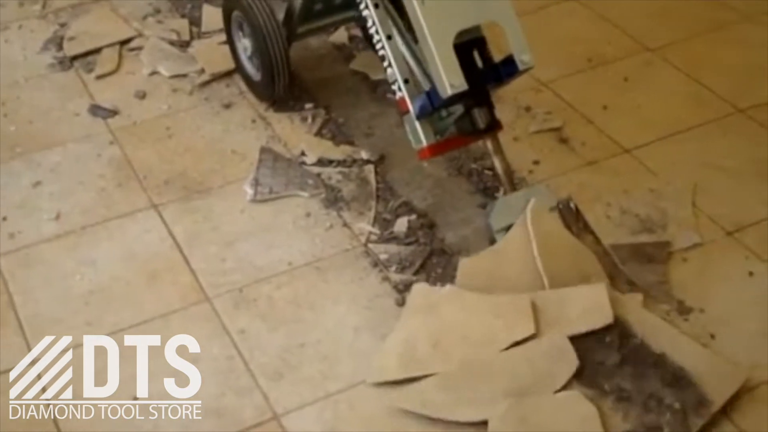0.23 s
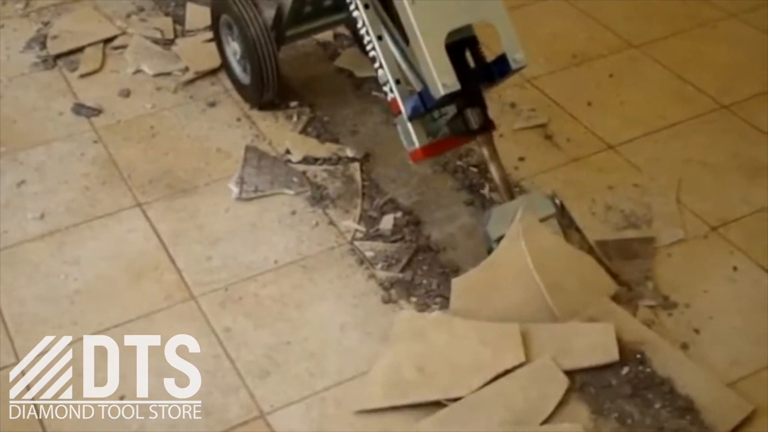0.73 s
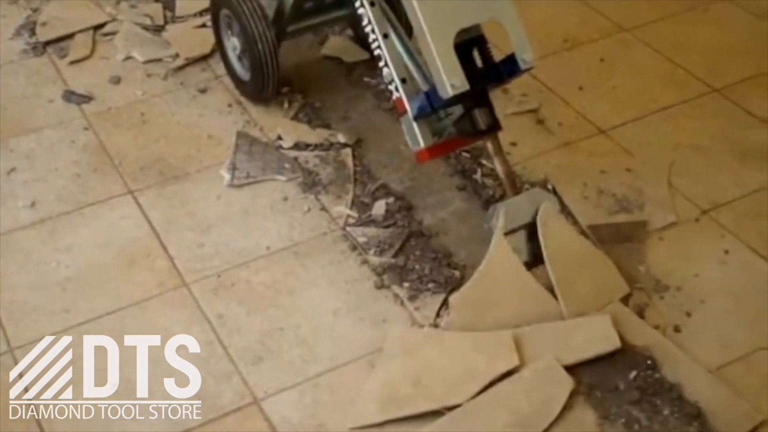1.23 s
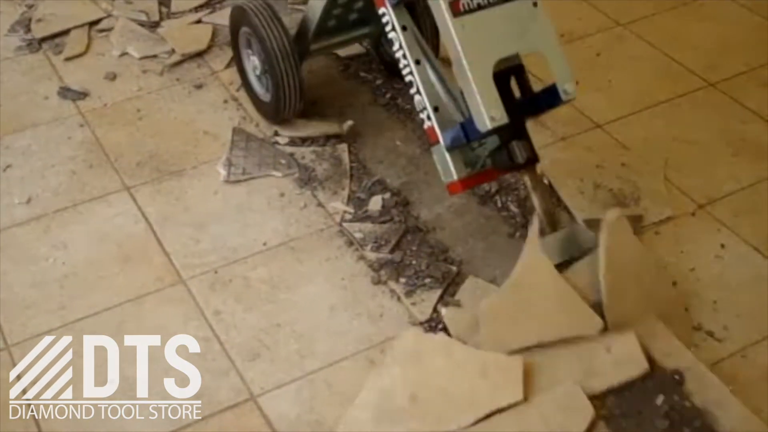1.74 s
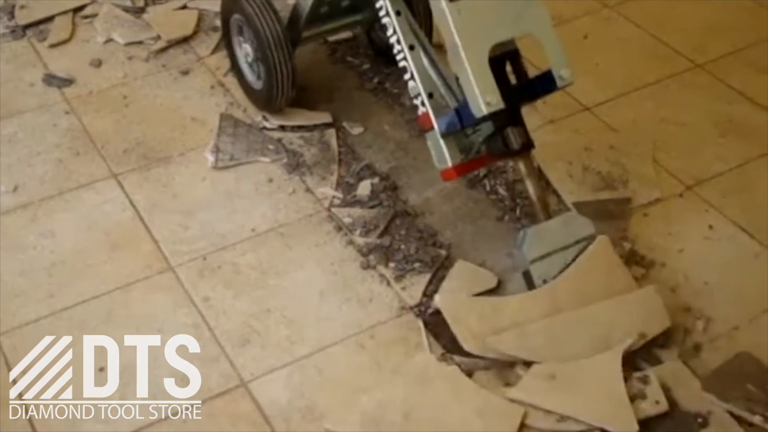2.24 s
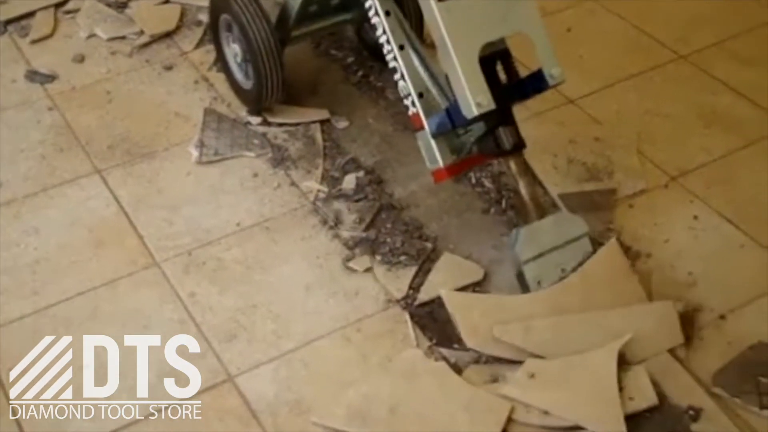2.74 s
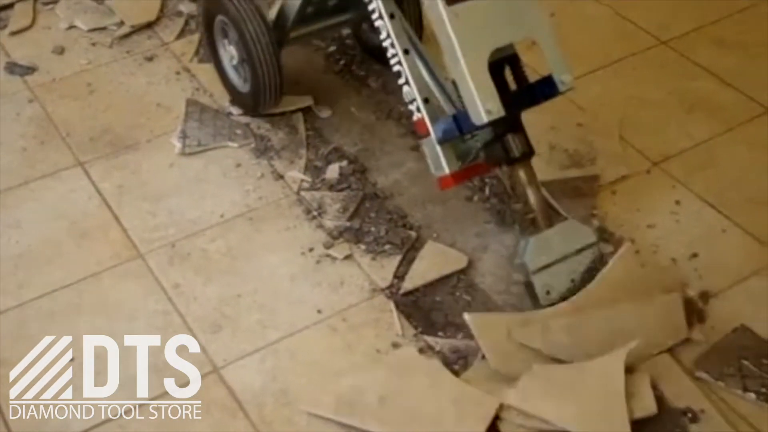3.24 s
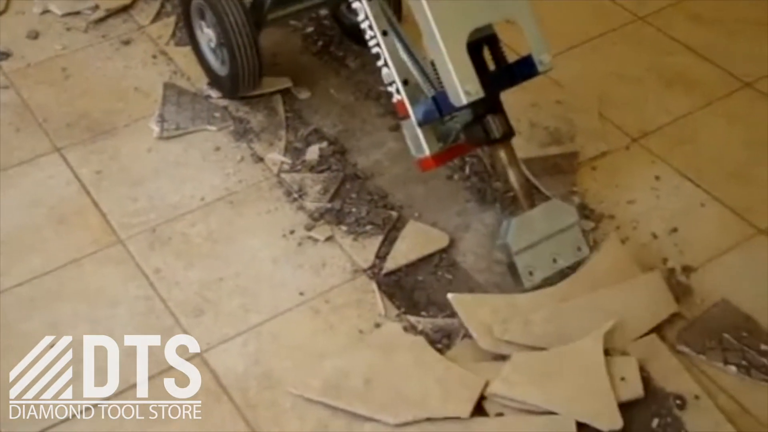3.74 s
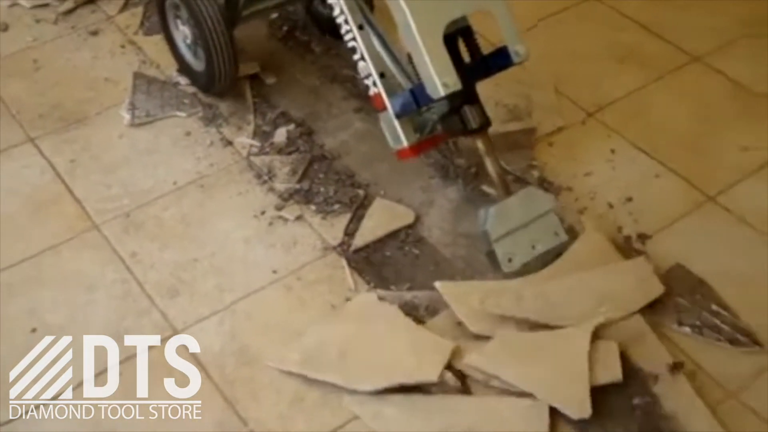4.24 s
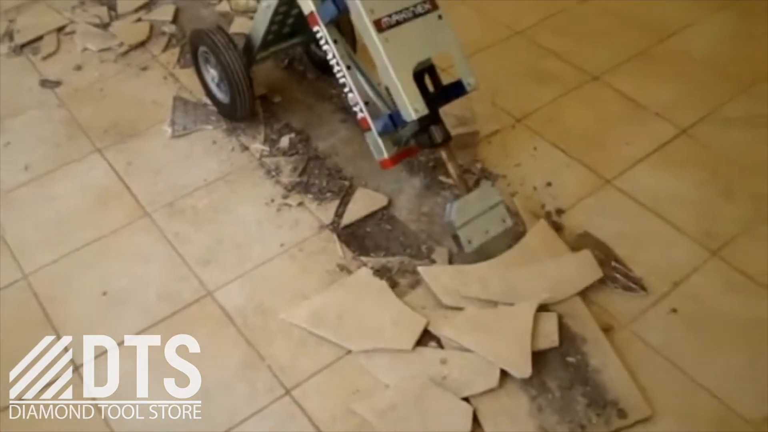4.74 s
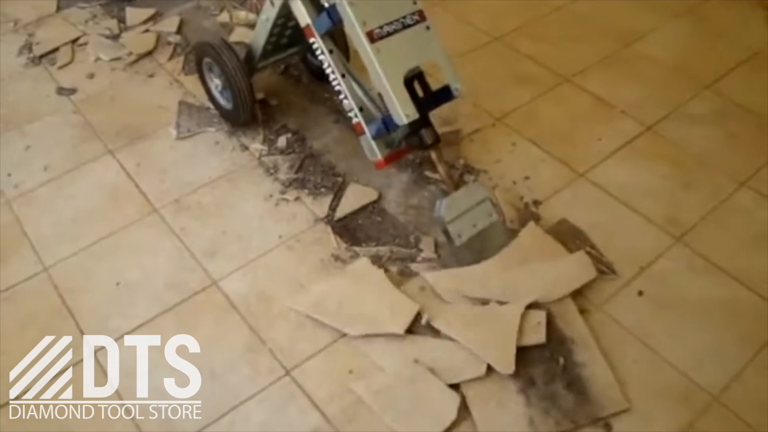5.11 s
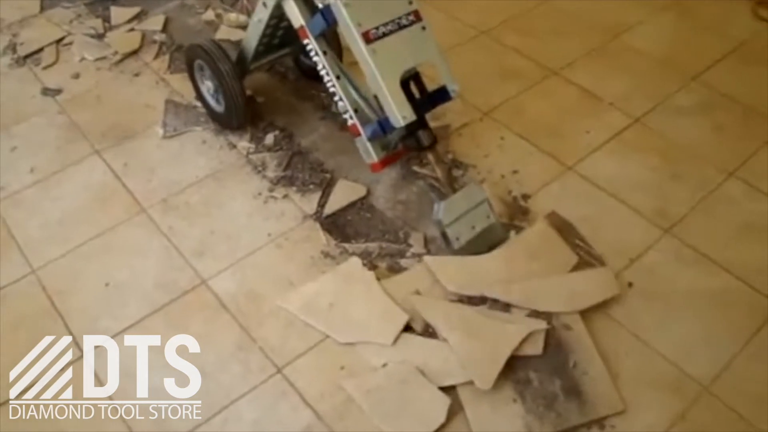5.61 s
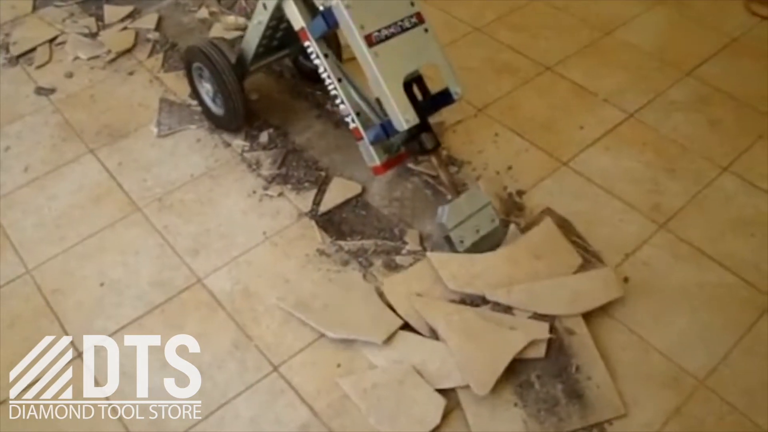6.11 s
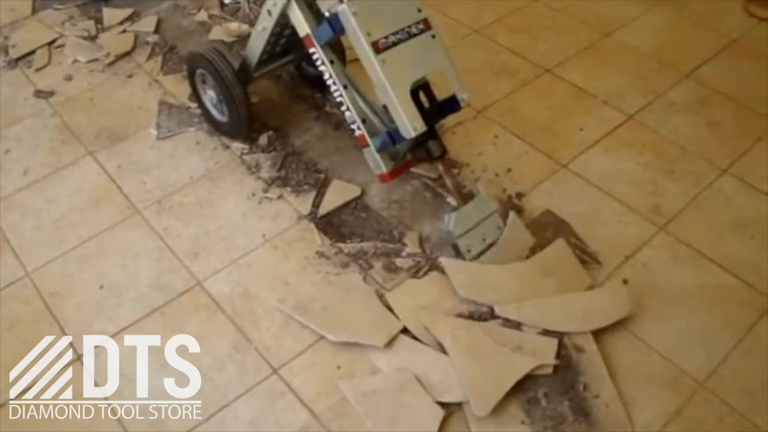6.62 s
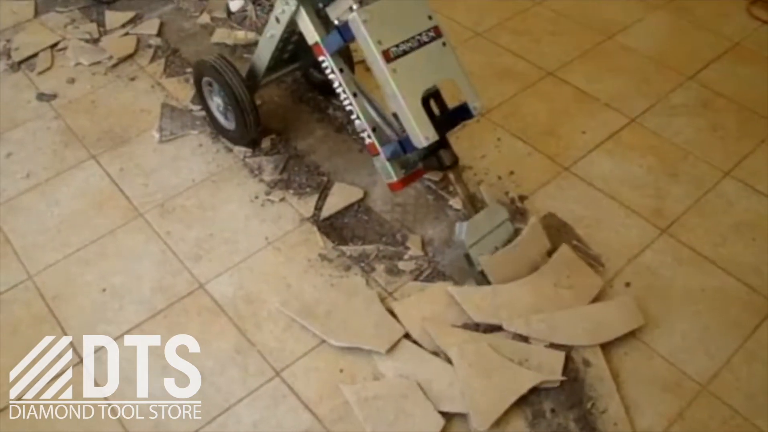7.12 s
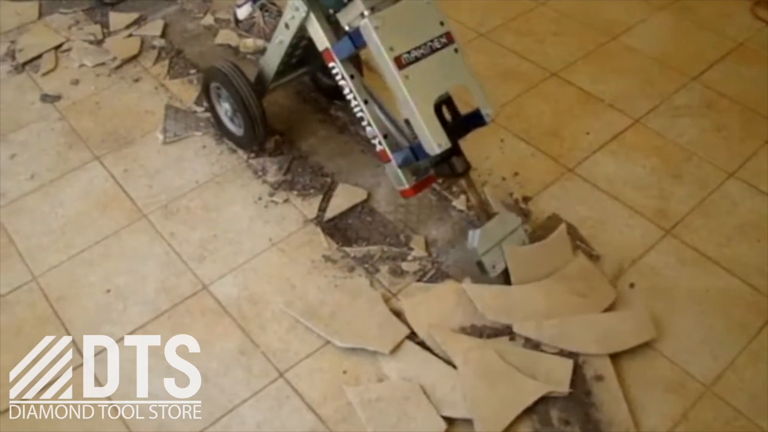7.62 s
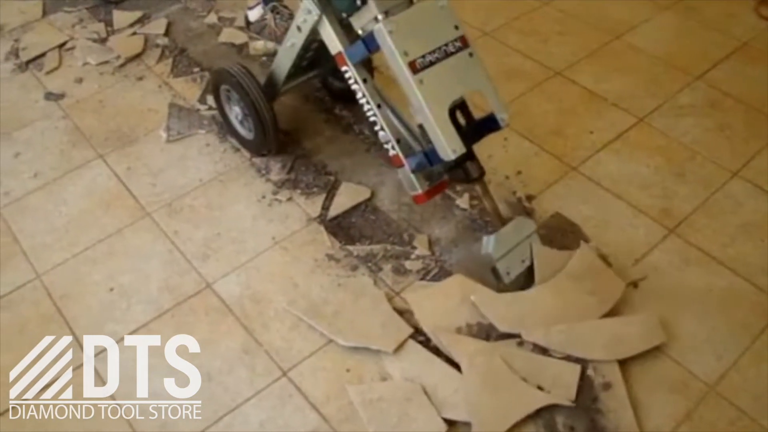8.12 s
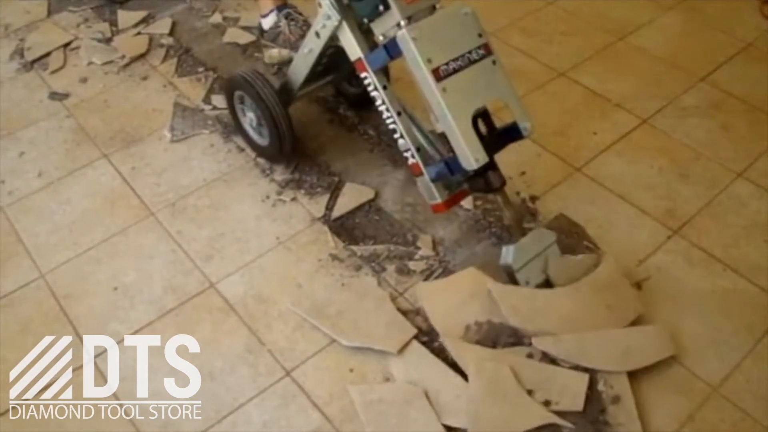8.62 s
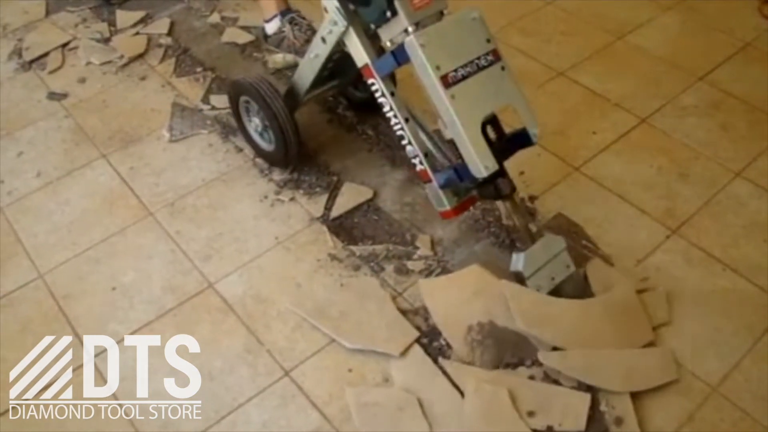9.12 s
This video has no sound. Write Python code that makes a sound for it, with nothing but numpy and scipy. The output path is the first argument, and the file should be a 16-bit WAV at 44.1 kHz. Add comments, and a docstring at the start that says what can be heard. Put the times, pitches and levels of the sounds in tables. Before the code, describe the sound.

In a hard, reverberant room, a nearby electric demolition hammer keeps up a fast, gritty metallic rattle as it lifts ceramic tiles from concrete. Surges of chattering tile and dull thudding come as the blade bites in, heaviest in the first half. Later the machine's own rattle and hum stand out more, while scattered brittle cracks and the crunch of mortar continue to the end.

```python
"""A rapid, gritty hammering fills a bare room: an electric demolition hammer is lifting ceramic tiles.
Each blow, about 24 a second, excites the modes of the housing, the steel chisel and the concrete floor.
The blade bites in and slows the motor, prises up tiles that chatter and crack, and now and then
rides off the mortar. Beneath it the mortar crunches, the motor whines and its fan blows, and the
hammer's trolley and the floor hum in forced vibration."""
import sys
import numpy as np
from scipy import signal
from scipy.fft import rfft, irfft, next_fast_len
from scipy.io import wavfile

SR = 44100
rng = np.random.default_rng(int(sys.argv[2]) if len(sys.argv) > 2 else 0)


def to_wav(sig):
    """Store sig (one row per channel, or 1-D mono) as 16-bit WAV at the path in sys.argv[1].

    Samples outside -1..1 are clipped; the rate is SR.
    """
    pcm = np.clip(np.atleast_2d(sig), -1, 1) * 32767
    pcm = np.round(pcm).astype(np.int16)
    wavfile.write(sys.argv[1], SR, pcm.T)  # frames by channels


N = 413216


def undb(db):
    """Decibels to amplitude ratio."""
    return 10 ** (np.asarray(db) / 20)

def unit(x):
    """Normalisation to rms 1."""
    return x / np.sqrt(np.mean(x ** 2))

def curves(table):
    """Linear interpolation of each column over time."""
    times, *columns = np.transpose(table)
    return [np.interp(np.arange(N) / SR, times, column) for column in columns]

def envelope(start, length, attack_s, release_s):
    """Linear rise to 1, a hold, then exponential decay."""
    t = np.arange(N) / SR - start
    return np.clip(t / attack_s, 0, 1) * np.exp(-np.maximum(t - length, 0) / release_s)

def swells(table, attack_s, release_s):
    """Incoherent events add in power: one gain curve for each level column."""
    power = sum(np.outer(undb(db) ** 2, envelope(start, length, attack_s, release_s) ** 2)
                for start, length, *db in table)
    return np.sqrt(power)

def colour(x, spectrum):
    """Spectral shaping by (Hz, dB) points, to rms 1."""
    hz, db = np.transpose(spectrum)
    size = next_fast_len(N + SR // 2)
    f = np.maximum(np.fft.rfftfreq(size, 1 / SR), 1)
    gain = undb(np.interp(np.log(f), np.log(hz), db))
    return unit(irfft(rfft(x, size) * gain, size)[:N])

def through(x, response):
    """Convolution with an impulse response."""
    return signal.oaconvolve(x, response)[:len(x)]

def ringing(modes):
    """Modal superposition: a tap excites a damped sine for each (Hz, dB, t60) mode."""
    t = np.arange(SR // 5) / SR
    return sum(undb(db) * np.sin(2 * np.pi * hz * t) * np.exp(-np.log(1000) * t / t60) * (-1) ** k
               for k, (hz, db, t60) in enumerate(modes))

def burst(t60):
    """Modal overlap: countless modes merge into decaying noise of unit energy."""
    decay = np.exp(-np.log(1000) * np.arange(int(t60 * SR) + 1) / (t60 * SR))[:SR]
    noise = rng.standard_normal(SR)[:len(decay)] * decay
    return noise / np.linalg.norm(noise)

def diffuse(x, t60, patterns):
    """Time-varying response: dense ringing crossfades between patterns as the machine moves."""
    place, out = np.linspace(0, patterns - 1, N), np.zeros(N + SR)
    for k in range(patterns):
        at = np.flatnonzero(abs(place - k) < 1)
        crossfade = np.cos(np.pi / 2 * (place[at] - k))
        sound = signal.fftconvolve(x[at] * crossfade, burst(t60))
        out[at[0]:at[0] + len(sound)] += sound
    return out[:N]

def clicks(times, sizes):
    """Brief contacts act as impulses; times in seconds."""
    at = np.round(times * SR).astype(int)
    inside = (at >= 0) & (at < N)
    return np.bincount(at[inside], sizes[inside], N)

def blows(turns, share, scatter_db, jitter_s):
    """Quasi-periodic excitation: one impulse a crank turn, uneven in force and timing."""
    chance = np.clip(rng.standard_normal((240, 2)), -1.7, 1.7)
    times = np.interp(np.arange(len(chance)) + share, turns, np.arange(N) / SR, left=-1, right=-1)
    return clicks(times + jitter_s * chance[:, 0], undb(scatter_db * chance[:, 1]))

def bounces(turns, per_s, spread_db, bunching):
    """A Poisson process: loose things collide at random, hardest just after each blow."""
    hit = rng.random(N) < per_s / SR
    size = undb(spread_db * np.clip(rng.standard_normal(N), -2, 2)) * rng.choice([-1, 1], N)
    return hit * size * np.exp(-bunching * (turns % 1))

def wander(cycles):
    """Random modulation: a glide to a new Gaussian value each cycle."""
    values = rng.standard_normal(240)
    return np.interp(cycles, np.arange(len(values)), values)

def harmonics(turns, orders, phases):
    """Fourier series on the blow rate; phases in cycles."""
    return unit(sum(undb(db) * np.sin(2 * np.pi * (round(k) * turns + phases[round(k)]))
                    for k, db in orders))


def room(x, wet_db):
    """Reverberation: hard floor and bare walls return a diffuse wash, weak in the bass."""
    low_cut = signal.butter(2, 260, "high", fs=SR, output="sos")
    tail = signal.sosfilt(low_cut, diffuse(x, t60=1, patterns=48))
    wash = np.r_[np.zeros(SR // 250), tail][:N]
    return (x + undb(wet_db) * wash) / np.sqrt(1 + undb(2 * wet_db))

# Partials of the machine's hum (the trolley shaking and the motor's 750 Hz whine) and of the floor's.
# Each row: multiple of the blow rate, relative level in dB.
MACHINE_PARTIALS = [(1, -16), (2, -14), (3, -15), (4, -15), (5, -16), (6, -4.5), (7, -16), (8, -7),
                    (9, -13), (12, 0), (13, 0), (14, 0), (15, -5), (16, -4), (17, 0), (18, 3), (24, 6),
                    (31, 9)]
FLOOR_PARTIALS = [(6, -7), (7, -17), (12, -8), (13, -1), (14, -8), (15, 0), (16, -6), (17, -3)]
def hum(turns, thud, recoil_db):
    """Forced vibration: the machine hums louder with the blade free, the floor with it wedged."""
    phases = rng.random(32)
    machine = undb(-51.5 + recoil_db) * harmonics(turns, MACHINE_PARTIALS, phases)
    floor = thud * undb(-17 - recoil_db) * harmonics(turns, FLOOR_PARTIALS, phases + .25)
    return machine + floor

# Spectrum of mortar and fan. Each row: frequency in Hz, relative level in dB.
GRIT_SPECTRUM = [(30, -44.5), (120, -28.5), (250, -21.5), (600, -7.5), (2000, 2.5), (4500, 1.5),
                 (5600, 5.5), (6400, 1), (7100, 4), (7700, 2), (8200, 3.5), (9000, 1), (10000, 0.5)]
def mortar_and_fan(turns):
    """Shot noise: mortar is crushed grain by grain over the broadband rush of the fan."""
    grains = bounces(turns, per_s=5000, spread_db=4, bunching=.7)
    grip = undb(2 * wander(turns))
    fan = undb(-11) * rng.standard_normal(N)
    return colour(unit(grains * grip) + fan, GRIT_SPECTRUM)

def plates(contacts, low_hz, high_hz, t60, modes, clack_db):
    """Plate vibration: each contact clacks and excites modes that change as tiles shift and break."""
    ring, hop = np.zeros(N + SR), SR // 14
    for start in range(0, N, hop):
        plate = [(low_hz + (high_hz - low_hz) * u, 0, t60 * (.5 + v)) for u, v in rng.random((modes, 2))]
        sound = signal.fftconvolve(contacts[start:start + hop], ringing(plate))
        ring[start:start + len(sound)] += sound
    return unit(ring[:N]) + undb(clack_db) * unit(contacts)

# Spectra of whole tiles and of broken pieces. Each row: frequency in Hz, relative level in dB.
TILE_SPECTRUM = [(200, -32), (450, -12.5), (620, -6.5), (780, -6.5), (1050, 3.5), (1190, -2), (1260, 1.5),
                 (1350, -4), (1700, -8.5), (2600, -8.5)]
PIECE_SPECTRUM = [(400, -45.5), (900, -8), (1600, -7), (1950, -1.5), (2280, -1.5), (2440, 1.5),
                  (2560, -3.5), (3020, -5), (3170, -3.5), (3750, -3.5), (4400, -7), (5800, -18),
                  (10000, -12.5)]
# Steady chatter of the heap before the blade. Each row: time in seconds, tiles in dB, pieces in dB.
HEAP_LEVELS = [(0, -30, -23), (.85, -30, -22), (2.8, -28, -22), (3.6, -25.5, -22.5), (4.7, -28.5, -22.5),
               (5.5, -28.5, -21), (6.2, -37.5, -29.5), (7, -41, -23.5), (7.75, -30.5, -23),
               (8.25, -40, -26.5), (8.85, -39, -28.5), (9.37, -29, -26)]
def chatter(turns, bite_tiles, prise_tiles, prise_pieces):
    """Impact excitation: ceramic bounces on the blade, small pieces ringing higher than whole tiles."""
    heavy = bounces(turns, per_s=800, spread_db=2, bunching=.3)
    light = bounces(turns, per_s=2200, spread_db=2.5, bunching=.1)
    tiles = plates(heavy, low_hz=541, high_hz=1737, t60=.025, modes=14, clack_db=10)
    pieces = plates(light, low_hz=1582, high_hz=4742, t60=.036, modes=20, clack_db=13.5)
    heap_tiles, heap_pieces = undb(curves(HEAP_LEVELS))
    tiles_gain = np.sqrt(heap_tiles ** 2 + bite_tiles ** 2 + prise_tiles ** 2)
    pieces_gain = np.hypot(heap_pieces, prise_pieces)
    return tiles_gain * colour(tiles, TILE_SPECTRUM) + pieces_gain * colour(pieces, PIECE_SPECTRUM)

# Tiles snapping. Each row: start in seconds, level in dB, pitch in Hz.
FRACTURES = [(.209, -23, 2450), (1.719, -12, 1250), (2.01, -3, 2730), (2.412, -5.5, 1280),
             (4.131, -9, 2440), (6.681, -8, 4650), (8.006, -9.5, 4300), (8.6, -9, 1398),
             (8.906, -10.5, 3870), (9.238, -9, 1930)]
def cracks():
    """Brittle fracture: a broadband snap and a brief ring of the freed piece."""
    modes = [(.62, -17), (1, 16.5), (1.47, -10), (1.9, -21)]  # frequency ratio, dB
    band = signal.butter(2, [800, 6500], "band", fs=SR, output="sos")
    out = np.zeros(N)
    for start, db, hz in FRACTURES:
        ring = ringing([(hz * ratio, mode_db, .09) for ratio, mode_db in modes])
        snap = signal.sosfilt(band, burst(t60=.18))
        tap = clicks(np.array([start]), undb([db]))
        out += undb(-11.5) * through(tap, ring / abs(ring).max()) + through(tap, snap / abs(snap).max())
    return signal.sosfilt(signal.butter(2, 400, "high", fs=SR, output="sos"), out)

# Knocks from the blow to the piston's return. Each row: share of the crank turn, relative level in dB.
STROKE_KNOCKS = [(0, 0), (.12, -3), (.33, -1.5), (.55, -3), (.76, -2)]
def stroke(turns, scatter_db, jitter_s):
    """Reciprocating motion: each knock of striker and piston recurs as its own impulse train."""
    for share, db in STROKE_KNOCKS:
        yield undb(db) * blows(turns, share, scatter_db, jitter_s)

# Modes of the floor under the blade. Each row: frequency in Hz, relative level in dB, t60 in seconds.
SLAB_MODES = [(306, -12.5, 0.0077), (349, -4, 0.026), (442, -6.5, 0.04), (508, 2, 0.047), (593, 8, 0.036),
              (674, 7.5, 0.041)]
def slab(turns):
    """Damped resonance: every knock of the stroke thuds into the concrete."""
    force = sum(stroke(turns, scatter_db=5.5, jitter_s=.00025))
    return unit(through(force, ringing(SLAB_MODES)))

# Modes of the steel chisel. Each row: frequency in Hz, relative level in dB, t60 in seconds.
CHISEL_MODES = [(4720, -11.5, 0.015), (5152, -6, 0.02), (5310, -9, 0.015), (6600, -12.5, 0.0024),
                (8500, -12.5, 0.0016)]
def chisel(turns):
    """Free vibration of a bar: the blade rings from the striker and as it skips over the floor."""
    strikes = unit(blows(turns, share=.05, scatter_db=2, jitter_s=.00004))
    skips = bounces(turns, per_s=350, spread_db=2, bunching=.1)
    grip = undb(1.5 * wander(turns))
    return unit(through(strikes + undb(17) * unit(skips * grip), ringing(CHISEL_MODES)))

# Spectrum of the casing. Each row: frequency in Hz, relative level in dB.
HOUSING_SPECTRUM = [(250, -30.5), (450, -17.5), (590, 3.5), (760, 3), (1100, -3.5), (1550, 2), (1950, 9.5),
                    (2400, -6.5), (2800, -6.5), (3750, 5.5), (4400, 3), (6300, -17.5), (10000, 0)]
def housing(turns):
    """Shell vibration: striker and piston excite the casing's dense modes much alike on every turn."""
    rattle = sum(diffuse(knocks, t60=.075, patterns=10)
                 for knocks in stroke(turns, scatter_db=1.2, jitter_s=.00001))
    return colour(rattle, HOUSING_SPECTRUM)

def motor_load(bite, lag_s=.1, full_load_db=-38):
    """First-order lag: the load, 0 to 1, follows the power of the bite."""
    keep = np.exp(-1 / (lag_s * SR))
    return signal.lfilter([1 - keep], [1, -keep], np.minimum(bite / undb(full_load_db), 1) ** 2)

# The blade bites into concrete. Each row: start and length in seconds, thud in dB, tile chatter in dB.
BLADE_BITES = [(-.05, 0.31, -39.5, -27), (.6, 0.082, -45.5, -26.5), (.91, .41, -41, -25.5),
               (1.76, 0.23, -42, -26), (2.08, 0.35, -35.5, -20.5), (2.5, 0.25, -41.5, -27),
               (3.2, 0.45, -36.5, -22), (3.68, .28, -38.5, -34), (4.75, 0.23, -40.5, -26.5),
               (6.28, .36, -46, -46), (6.94, 0.19, -43.5, -28), (8.7, 0.41, -42.5, -36)]
# A tile is prised up. Each row: start and length in seconds, whole tile in dB, broken pieces in dB.
TILE_PRISES = [(.09, .13, -22, -20.5), (.26, 0.28, -25.5, -21), (1.33, .24, -22, -17.5),
               (1.62, .16, -26, -22.5), (1.96, 0.56, -28, -21), (3.8, 0.22, -34, -22.5),
               (4.0, 0.32, -32, -20), (5.02, 0.27, -29.5, -18), (6.66, 0.18, -44, -23),
               (7.24, 0.29, -35, -26), (8.5, .2, -44, -26), (8.98, 0.061, -37, -16.5)]
# The blade rides off the mortar. Each row: start and length in seconds, drop of the crunch in dB.
BLADE_LIFTS = [(.3, 0.21, 2.5), (0.87, 0.39, 1.5), (2.075, 0.37, 5.5), (2.517, 0.23, 3.5),
               (2.906, 0.12, 12), (3.21, 0.19, 2), (4.2, 0.21, 2), (5.36, .32, 2), (7.53, 0.35, 0.5),
               (8.12, 0.19, 3), (9.237, 0.14, 3.5)]
# Recoil, stronger when the blade is not wedged. Each row: time in seconds, relative level in dB.
RECOIL_LEVELS = [(0, -4), (.8, -7), (2.2, -5.5), (3, -8), (3.9, -5.5), (4.5, -.5), (6, .5), (8, 0),
                 (9.37, -1.5)]
def scene():
    """Superposition: the crank sets the rhythm; bites, prises, lifts and recoil set the strengths."""
    bite, bite_tiles = swells(BLADE_BITES, attack_s=.06, release_s=.07)
    prise_tiles, prise_pieces = swells(TILE_PRISES, attack_s=.067, release_s=.04)
    lift_db = -sum(db * envelope(start, length, attack_s=.03, release_s=.012)
                   for start, length, db in BLADE_LIFTS)
    recoil_db, = curves(RECOIL_LEVELS)
    skim = undb(-49 + recoil_db + lift_db)  # the blade grazes the concrete
    thud = np.hypot(bite, skim)

    free_hz, sag_hz, waver_hz = 24.22, .28, 6.7
    load = motor_load(bite)
    turns = np.cumsum(free_hz - sag_hz * load) / SR + .3  # crank angle, one blow a turn

    tiles = undb(.11 * lift_db) * chatter(turns, bite_tiles, prise_tiles, prise_pieces)
    floor = thud * slab(turns) + tiles
    # The chisel's ring wavers by chance, and grows with load and while a tile is prised up.
    ring_db = -28 + .2 * lift_db - .9 * wander(turns * waver_hz / free_hz)
    ring_db += .5 * load + 1.5 * prise_pieces / prise_pieces.max()
    tool = undb(-26 + recoil_db) * housing(turns) + undb(ring_db) * chisel(turns)
    debris = undb(-18.5 + lift_db) * mortar_and_fan(turns) + cracks()
    sound = room(floor + tool + debris, wet_db=-2.5) + hum(turns, thud, recoil_db)
    return np.array([sound, sound])

def record(dry):
    """Compression and band limiting: fast gain control holds down peaks; a steep filter cuts the top."""
    response_s, threshold_db, top_hz = .005, -16, 9970
    keep = np.exp(-1 / (response_s * SR))
    power = signal.lfilter([1 - keep], [1, -keep], dry[0] ** 2)
    gain = (1 + (power / undb(threshold_db) ** 2) ** 2) ** -.2
    return signal.sosfilt(signal.ellip(12, .2, 80, top_hz, fs=SR, output="sos"), dry * gain)


dry = scene()
out = record(dry)
to_wav(out)
```